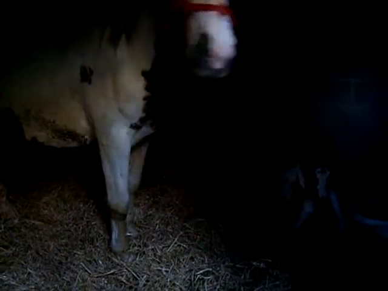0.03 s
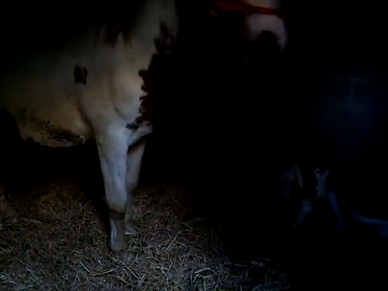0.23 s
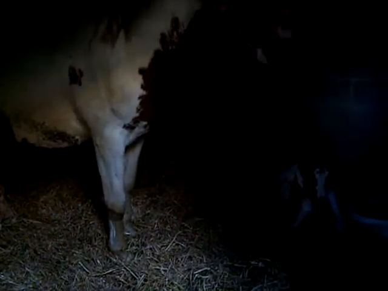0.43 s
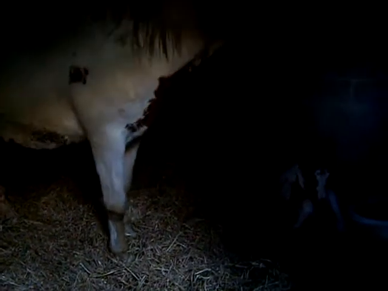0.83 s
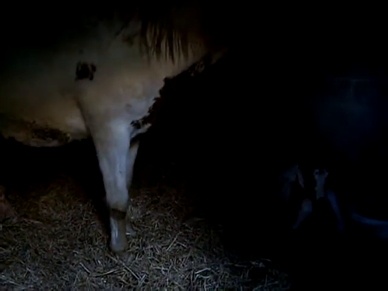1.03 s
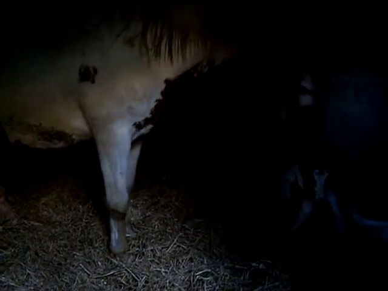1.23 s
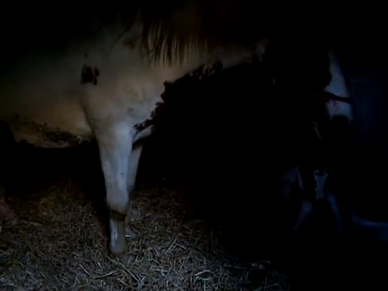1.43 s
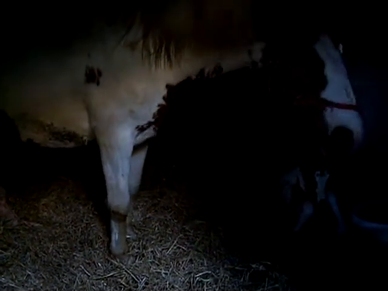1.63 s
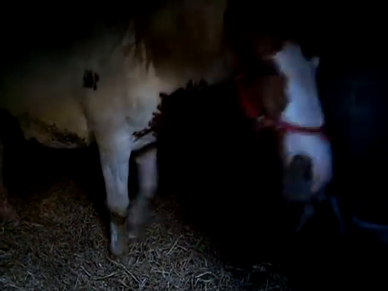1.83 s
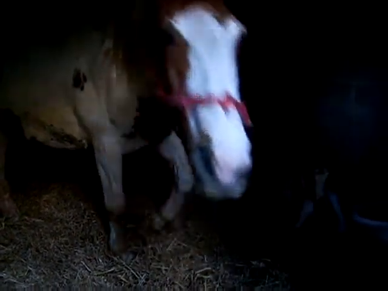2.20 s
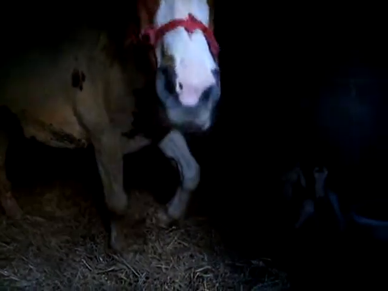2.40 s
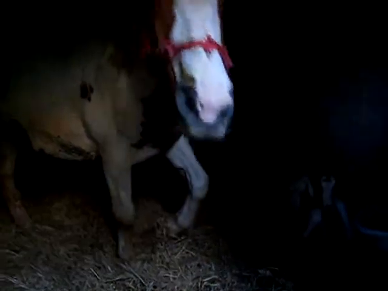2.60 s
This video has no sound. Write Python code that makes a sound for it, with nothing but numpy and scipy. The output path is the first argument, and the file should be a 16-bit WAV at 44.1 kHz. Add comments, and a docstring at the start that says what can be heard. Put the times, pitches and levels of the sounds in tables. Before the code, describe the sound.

A horse gives one long whinny in a wooden stall. It starts as a held squeal, turns rough, then quivers as it sinks and fades. Straw crackles faintly underfoot, and the boards add a short echo.

```python
"""In a wooden stall, a horse whinnies with two voices at once: a low vocal-fold tone and a high whistle.
The call starts as a held squeal, turns rough, then quivers about ten times a second as it sinks and fades.
Air hisses through the nostrils, the boards throw the call back, and straw crackles underfoot."""
import sys
import numpy as np
from scipy import signal
from scipy.fft import rfft, irfft
from scipy.io import wavfile

SR = 44100
rng = np.random.default_rng(int(sys.argv[2]) if len(sys.argv) > 2 else 0)


def dump_mix(stems):
    """Bounce the given channels to the path in sys.argv[1] as a 16-bit WAV at rate SR."""
    frames = np.atleast_2d(stems).T  # one column per channel
    limited = np.clip(frames, -1, 1)  # hard clip at full scale
    pcm = np.round(limited * 32767).astype(np.int16)
    wavfile.write(sys.argv[1], SR, pcm)


N = 121275
t = np.arange(N) / SR
TOP_HZ = 8300

# faint scoop, held squeal, quivering tail
# (time [s], fundamental [dB], second harmonic [dB], whistle [dB], upper harmonics [dB])
SCOOP = [(.118, -66.5, -77, -75, -98), (.142, -60, -65, -77, -101)]
SQUEAL = [(0.158, -68, -54, -51.5, -62), (0.192, -58, -45.5, -51.5, -53.5), (0.296, -62, -40.5, -39, -49.5),
          (0.332, -50.5, -38, -51, -52.5), (0.438, -44.5, -39.5, -43, -45.5), (0.62, -48, -57, -47, -53.5),
          (0.69, -35, -49.5, -44, -60.5), (0.718, -39, -55, -63, -62), (0.742, -32.5, -47.5, -46, -44),
          (0.775, -34, -34.5, -49.5, -51), (0.805, -32.5, -31, -59.5, -40),
          (0.865, -36.5, -32, -44.5, -58.5), (0.912, -27, -41.5, -48, -44.5),
          (0.945, -39, -31.5, -47, -62.5), (0.988, -33.5, -40, -53, -55), (1.032, -54.5, -38, -42, -61.5),
          (1.06, -37.5, -36.5, -61, -77)]
QUIVER = [(1.08, -35.5, -31, -37.5, -65.5), (1.12, -43, -42.5, -41, -74.5), (1.19, -31, -44, -35, -54),
          (1.268, -49, -60.5, -38, -50), (1.31, -42.5, -47.5, -47, -52.5), (1.35, -51.5, -58, -70, -51),
          (1.384, -42, -54, -40.5, -45.5), (1.518, -48, -61.5, -51.5, -51),
          (1.57, -41.5, -58.5, -47.5, -47.5), (1.602, -45, -52, -52, -53.5),
          (1.635, -46.5, -50.5, -37.5, -53.5), (1.675, -40, -56.5, -39, -54),
          (1.758, -43.5, -42.5, -45, -60), (1.804, -46.5, -51.5, -39, -68.5), (1.87, -40, -50, -42, -70.5),
          (1.955, -36.5, -50, -40, -65), (2.04, -37, -54.5, -41, -64), (2.212, -42, -55.5, -42, -52),
          (2.285, -36, -57.5, -33, -49.5), (2.335, -52.5, -67, -43.5, -58), (2.368, -41, -59.5, -38, -57.5),
          (2.41, -53.5, -74.5, -58, -67), (2.45, -48.5, -63.5, -48, -55), (2.5, -45, -50.5, -47.5, -57.5),
          (2.535, -56.5, -65.5, -72.5, -69), (2.604, -41.5, -53.5, -43.5, -75.5),
          (2.64, -62, -56, -54.5, -83), (2.7, -58, -65, -72, -83), (2.74, -95, -92, -89, -76)]
# grit in the voice (time [s], roughness [0-1])
ROUGHNESS = [(.15, 0.15), (.3, 0.24), (.45, 0.35), (.62, 0.34), (.9, 0.31), (1.03, 0.61), (1.12, 0.57),
             (1.22, 0.7), (1.32, 0.93), (1.52, 0.56), (1.65, 0.66), (2.3, .75), (2.7, 1)]

def whinny():
    """Folds and whistle sing at unrelated pitches through the throat, with breath on top."""
    first, second, high, upper = (swell([*SCOOP, *SQUEAL, *QUIVER], column=k) for k in (1, 2, 3, 4))
    rough = curve(ROUGHNESS)
    flap, flap_rms = rattle()
    fold_hz, whistle_hz, dip = pitches(rough, flap)
    fold_phase = phase_of(fold_hz)
    low = vocal_folds(fold_phase, dip, rough, first, second, upper)
    low += undertones(fold_phase, fold_hz / (1 - dip))
    shrill = high * whistle(phase_of(whistle_hz), fold_phase)
    grit = high * rough * rasp(fold_phase)
    call = throat(low * flutter(rough) + shrill * flutter(rough) + grit) + growls()
    return call * (1 + flap) / flap_rms + breath(fold_phase) + squeak()


# melodies of the two voices (time [s], pitch [Hz])
FOLD_PITCH = [(.12, 921), (.138, 843), (.149, 640.6), (.3, 625.2), (.45, 611.7), (.55, 634), (.71, 637.4),
              (.76, 608.4), (.81, 597), (.92, 574.3), (1.0, 560.4), (1.04, 619.3), (1.17, 568.4),
              (1.27, 529.1), (1.42, 519), (1.55, 513.7), (1.75, 499.5), (1.85, 521.3), (2.05, 522),
              (2.28, 507.7), (2.38, 487.6), (2.48, 436.7), (2.6, 407), (2.72, 396.2)]
WHISTLE_PITCH = [(.13, 1402), (.18, 1523), (.28, 1609), (.37, 1604), (.44, 1719), (.54, 1818), (.70, 1757),
                 (.81, 1760), (.92, 1690), (1.02, 1605), (1.10, 1544), (1.16, 1572), (1.22, 1440),
                 (1.3, 1391), (1.44, 1434), (1.72, 1421), (1.92, 1478), (2.28, 1435), (2.36, 1340),
                 (2.43, 1380), (2.48, 1260), (2.6, 1148), (2.7, 1185)]
# throat shakes (time [s], dip [share of fold pitch], half-width [s])
SHAKES = [(1.014, 0.11, 0.013), (1.117, 0.12, 0.012), (1.225, 0.12, 0.018), (1.336, 0.089, 0.01815),
          (1.587, .18, .018), (1.692, 0.23, .032), (1.794, 0.2, 0.017), (1.895, 0.25, .017),
          (1.991, 0.24, .016), (2.103, .2, 0.015), (2.212, .18, 0.019), (2.307, .22, .014),
          (2.43, .26, 0.023), (2.545, 0.18, 0.017)]

def pitches(rough, flap):
    """Both voices dip at every shake of the throat and jitter as they roughen; the flap bends the folds."""
    dip = sum(depth * bump(at, width) for at, depth, width in SHAKES)
    waver = .01124 * wobble(rate_hz=26.86)
    jitter = .026 * rough * wobble(rate_hz=119.5)
    fold_hz = curve(FOLD_PITCH) * (1 - dip) * (1 + .012 * flap + waver + jitter)
    whistle_hz = curve(WHISTLE_PITCH) * (1 - .09 * np.tanh(dip / .066))  # dips by 9% at most
    whistle_hz *= 1 + .012 * rough * wobble(rate_hz=73.4)
    return fold_hz, whistle_hz, dip


# ride on the third harmonic (time [s], gain [dB])
THIRD_RIDE = [(.15, -1.5), (.4, -13.5), (.55, -15), (1.0, -2.5), (1.2, 2), (1.55, -7), (1.8, 18.5),
              (2.7, -17.5)]
# balance of harmonics 4 to 8 (gain [dB])
UPPER_MIX = [-11.5, -17.5, -17.5, -24, -21.5]

def vocal_folds(phase, dip, rough, first, second, upper, duck_db=-5):
    """The folds buzz in eight harmonics: the fundamental ducks at each shake, the others flutter."""
    body = first * undb(.5 + duck_db * dip / dip.max()) * tone(phase)
    body += second * tone(2 * phase) * flutter(rough)
    gains = [undb(4 + curve(THIRD_RIDE)), *undb(UPPER_MIX)]
    return body + upper * sum(gain * tone(k * phase) * flutter(rough) for k, gain in enumerate(gains, 3))


# how strongly the voices modulate each other (time [s], sideband gain [dB])
COUPLING = [(.15, -29), (.35, -23.5), (.5, 0), (.63, 6), (.8, -1.5), (.95, -12), (1.2, -8), (2.7, -8)]

def whistle(phase, fold_phase):
    """The high voice and the folds modulate each other, adding difference and sum tones."""
    sidebands = undb(-9.5) * tone(phase - fold_phase) + undb(-6.5) * tone(phase + fold_phase)
    sidebands += undb(-16.5) * tone(2 * phase - fold_phase)
    return undb(-3) * (tone(phase) + undb(curve(COUPLING)) * sidebands)


# half tone in the squeal, undertone in the tail (time [s], level [dB])
HALF_TONE = [(0.7, -75.5), (0.742, -60), (0.89, -63.5), (1.252, -75.5), (1.28, -73)]
UNDERTONE = [(1.58, -58), (1.72, -48), (1.9, -53), (2.1, -61), (2.35, -52), (2.5, -59)]

def undertones(fold_phase, unshaken_hz):
    """The folds swing at half rate in the squeal; a steadier tone sits beneath them as the call sinks."""
    half = tone(fold_phase / 2) + undb(14.5) * tone(1.5 * fold_phase)
    half *= swell(HALF_TONE) * undb(.5) * wobble(rate_hz=28)
    return half + swell(UNDERTONE) * tone(phase_of(.73 * unshaken_hz))


# midrange bite (frequency [Hz], gain [dB])
RASP_EQ = [(600, -15.5), (850, -21.5), (1050, 15.5), (1400, 6), (1650, -8), (1950, -1), (2400, -5),
           (4000, -38)]

def rasp(fold_phase):
    """Gritty noise pulses with each swing of the folds."""
    return undb(-15.5) * noise(RASP_EQ) * (1 + np.cos(fold_phase))


# swing of the flap (time [s], depth [0-1])
RATTLE = [(.3, .1), (.9, .08), (1.3, .24), (2.3, .16)]

def rattle(rate_hz=48, scatter=.45):
    """A flap in the throat opens and shuts unevenly; returns its swing and the rms of 1 + swing."""
    depth = curve(RATTLE)
    phase = phase_of(rate_hz * (1 + scatter * wobble(rate_hz)))
    return depth * np.sin(phase), np.sqrt(1 + depth ** 2 / 2)


# throat resonances, mouth open and closed (frequency [Hz], gain [dB])
OPEN_EQ = [(200, -4.5), (640, -1), (710, 6), (800, -20.5), (900, -5.5), (1010, -1.5), (1400, -2), (1700, 4),
           (1950, 3.5), (2130, -3), (2400, -3), (2700, -1.5), (3500, -2.5)]
CLOSED_EQ = [(200, -4), (280, -3.5), (350, -2.5), (540, 3.5), (620, -17), (780, -9.5), (900, -12.5),
             (1030, 5.5), (1120, -7.5), (1200, -18.5), (1320, -0.5), (1420, 2), (1490, -16), (1590, 8),
             (1730, -6), (1900, 2.5), (2120, -3), (2400, 1.5), (3500, -9)]
# crossfade between them (time [s], closed share [0-1])
CLOSING = [(1.15, 0.24), (1.32, 0.52)]

def throat(x):
    """The resonances shift as the mouth half closes for the quiver."""
    closed = curve(CLOSING)
    return (1 - closed) * equalise(x, OPEN_EQ) + closed * equalise(x, CLOSED_EQ)


# growls in the quiver (start [s], length [s], level [dB])
GROWLS = [(1.205, 0.032, -66.5), (1.781, 0.049, -65), (1.985, 0.087, -59), (2.098, 0.068, -58),
          (2.194, 0.064, -55.5), (2.527, 0.078, -64.5)]

def growls(pitch_hz=212.4, jitter=.07):
    """Short, low, unsteady tones sound under some of the later shakes."""
    level = np.zeros(N)
    for at, length, db in GROWLS:
        progress = np.clip((t - at) / length, 0, 1)
        level += undb(db) * np.sqrt(np.abs(np.sin(np.pi * progress)))
    return level * tone(phase_of(pitch_hz * (1 + jitter * wobble(rate_hz=45))))


# breath hiss and nasal ring (time [s], level [dB])
HISS = [(0.17, -70.5), (0.26, -61.5), (0.33, -63.5), (0.41, -59), (1.26, -63.5), (1.26, -64.5), (1.28, -73),
        (1.48, -68.5), (1.59, -71.5), (2.06, -65.5), (2.23, -70), (2.28, -61.5), (2.32, -73), (2.54, -64),
        (2.69, -65.5), (2.74, -80)]
NOSE_LEVEL = [(0.15, -112), (0.23, -55), (0.4, -44.5), (0.49, -53), (0.54, -42), (.65, -47.5), (1.012, -53),
              (1.4, -83)]
# colour of the hiss (frequency [Hz], gain [dB])
HISS_EQ = [(150, -5), (350, 0.5), (800, 6.5), (1300, 14.5), (2200, 7), (3000, 7.5), (4200, 3.5), (6000, 4),
           (8500, -1.5)]
# melody of the ring (time [s], pitch [Hz])
NOSE_PITCH = [(.22, 3676), (.35, 3473), (.44, 3648), (.53, 3623), (.58, 3466), (.7, 3370), (.85, 3500),
              (1.1, 3480)]
# pure tone against breathiness in the ring (time [s], purity [0-1])
NOSE_PURITY = [(.3, .2), (.38, 0.83), (.56, 0.7), (.75, 0.22)]

def breath(fold_phase):
    """Air hisses and whistles thinly in the nose, pulsing in time with the folds."""
    hiss = swell(HISS) * undb(4.5) * noise(HISS_EQ)
    purity = curve(NOSE_PURITY)
    phase = phase_of(curve(NOSE_PITCH) * (1 + .0054 * wobble(rate_hz=44)))
    breathiness = np.sqrt(1 - purity ** 2) * wobble(rate_hz=150)
    ring = swell(NOSE_LEVEL) * undb(-6.5) * (purity + breathiness) * tone(phase)
    return (hiss + ring) * (1 + .34 * np.cos(fold_phase))


# path of the squeak (time [s], pitch [Hz], level [dB])
SQUEAK = [(1.33, 2073, -66.5), (1.39, 2123, -69), (1.45, 2263, -60), (1.52, 2154, -66), (1.58, 2056, -64)]
# its partials (ratio [x pitch], gain [dB])
SQUEAK_PARTIALS = [(1, 0), (1.5, -6), (2, -7), (2.2, -9)]

def squeak(jitter=.0089):
    """A faint, unsteady squeak rides on the sinking call."""
    phase = phase_of(curve(SQUEAK) * (1 + jitter * wobble(rate_hz=69)))
    partials = sum(undb(db) * tone(ratio * phase) for ratio, db in SQUEAK_PARTIALS)
    return swell(SQUEAK, column=2) * undb(-.5) * partials


# early reflections (delay [s], gain [linear])
BOARDS = [(.0047, 0.21), (.0093, 0.054), (0.0143, .18), (0.0205, 0.22)]

def stall(x, t60_s=.4, tail_db=-4):
    """The boards throw back early echoes and a short diffuse tail."""
    age = t[:SR // 2]
    tail = rng.standard_normal(len(age)) * np.exp(-np.log(1000) * age / t60_s) * np.minimum(age / .019, 1)
    response = tail / np.linalg.norm(tail) * undb(tail_db)
    for delay, gain in BOARDS:
        response[int(delay * SR)] += gain
    response[0] += 1  # direct sound
    return signal.fftconvolve(x, response / np.linalg.norm(response))[:N]


# drop-outs of the fundamental (time [s], depth [0-1])
FUNDAMENTAL_DROPOUTS = [(0.38, 1), (.447, 0.89), (0.538, 0.78), (0.682, 0.97), (0.728, 0.99), (0.851, .7),
                        (.96, 0.8), (1.016, 0.7), (1.111, 0.5), (1.276, .6), (1.346, 0.65), (1.487, 0.66),
                        (1.531, .9), (1.626, 0.67), (2.081, 0.8)]
# gaps that part the tail into grunts, and drop-outs of the second harmonic (time [s])
GRUNT_GAPS = [2.437, 2.548, 3.2]
SECOND_DROPOUTS = [.21, .264, .291, .357, .384, .457, .535, .605, .696, .843]

def echo_dropouts(x, fundamental_hz=(280, 800), second_hz=(980, 1420)):
    """The two lowest harmonics drop out briefly as the stall's echo cancels the wavering tone."""
    x = duck_band(x, FUNDAMENTAL_DROPOUTS, fundamental_hz, width_s=.0075)
    x = duck_band(x, [(at, .6) for at in GRUNT_GAPS], fundamental_hz, width_s=.02)
    return duck_band(x, [(at, .63) for at in SECOND_DROPOUTS], second_hz, width_s=.0075)


# snapping stalks (time [s], relative level [dB])
SNAPS = [(0.7536, -54), (1.263, -52.5), (1.3921, -58.5), (1.773, -57), (2.0267, -54.5), (2.2819, -53.5),
         (2.6729, -55.5)]
# dry, crisp colour (frequency [Hz], gain [dB])
STRAW_EQ = [(400, -6), (1500, -2.5), (3000, -5), (6000, -2.5), (8500, -8.5)]

def straw(crackles_per_s=30, start_s=.35, decay_s=.0019):
    """A few stalks snap underfoot and many more crackle faintly, each a tiny burst of noise."""
    draws = rng.random((int(crackles_per_s * N / SR), 2))
    crackles = [(start_s + when * (N / SR - start_s), -70 + 10 * force ** 2) for when, force in draws]
    kicks = np.zeros(N)
    for at, db in [*SNAPS, *crackles]:
        kicks[min(int(at * SR), N - 1)] += undb(db + 8)
    bursts = signal.lfilter([1], [1, -np.exp(-1 / (decay_s * SR))], kicks)
    return colour(bursts * rng.standard_normal(N), STRAW_EQ)


# soft hush and low rumble (frequency [Hz], gain [dB])
HUSH_EQ = [(15, -65), (25, -27), (75, -6), (145, -7.5), (172, -16.5), (204, -13.5), (280, 6.5), (1040, -6),
           (6500, -28.5), (8500, -57.5), (11000, -87), (18700, -120)]
RUMBLE_EQ = [(25, -2.5), (70, -9), (130, -2), (220, -3), (400, -18.5)]

def room_tone():
    """A steady, quiet bed of noise lies under everything."""
    return undb(-81) * noise(HUSH_EQ) + undb(-74) * noise(RUMBLE_EQ)


def undb(db):
    """Decibels to gain."""
    return 10 ** (np.asarray(db) / 20)


def curve(table, column=1):
    """One column of a table, joined by straight lines in time."""
    rows = np.array(table, float)
    return np.interp(t, rows[:, 0], rows[:, column])


def swell(table, column=1, fade_s=.0041):
    """Gain from a dB column, fading out beyond its ends."""
    outside = np.maximum(table[0][0] - t, 0) + np.maximum(t - table[-1][0], 0)
    return undb(curve(table, column)) * np.exp(-outside / fade_s)


def bump(at, width_s):
    """Bell-shaped envelope of height 1."""
    return np.exp(-((t - at) / width_s) ** 2)


def duck_band(x, dips, band_hz, width_s):
    """Pull one band down at each (time, depth) dip."""
    band = signal.sosfiltfilt(signal.butter(4, band_hz, "bandpass", fs=SR, output="sos"), x)
    return x - band * sum(depth * bump(at, width_s) for at, depth in dips)


def eq_gain(points):
    """Gain per spectrum bin from (Hz, dB) points."""
    hz, db = np.array(points, float).T
    return undb(np.interp(np.log(np.arange(N // 2 + 1) * SR / N + 1), np.log(hz), db))


def equalise(x, points):
    """Filter by an EQ curve."""
    return irfft(rfft(x) * eq_gain(points), N)


def colour(x, points):
    """EQ with the top rolled off, keeping the power of white noise."""
    gain = eq_gain(points) / (1 + (np.fft.rfftfreq(N, 1 / SR) / TOP_HZ) ** 20)
    return irfft(rfft(x) * gain / np.sqrt(np.mean(gain ** 2)), N)


def noise(points):
    """Coloured noise of rms 1."""
    return colour(rng.standard_normal(N), points)


def wobble(rate_hz):
    """Random motion of spread 1, rolled off above the rate."""
    x = signal.sosfilt(signal.butter(2, rate_hz, fs=SR, output="sos"), rng.standard_normal(N))
    return x / x.std()


def flutter(rough, depth=.28):
    """Random tremolo that deepens with roughness at constant power."""
    return (1 + depth * rough * wobble(rate_hz=79)) / np.hypot(1, depth * rough)


def phase_of(hz):
    """Running phase of a moving pitch."""
    return 2 * np.pi * np.cumsum(hz) / SR


def tone(phase):
    """Sine of rms 1."""
    return np.sqrt(2) * np.sin(phase)


def scene():
    """The horse in its stall, over room tone and straw, in mono."""
    horse = echo_dropouts(stall(whinny()))
    return (horse + room_tone() + straw())[None]


def record(dry):
    """A steep low-pass cuts the top."""
    return signal.sosfilt(signal.ellip(8, .2, 70, TOP_HZ, fs=SR, output="sos"), dry)


dry = scene()
out = record(dry)
dump_mix(out)
```